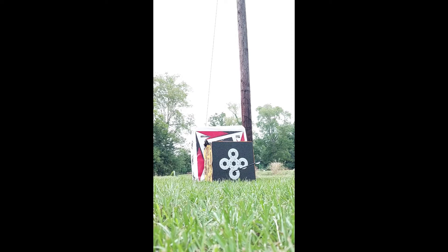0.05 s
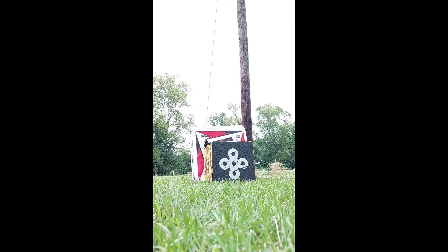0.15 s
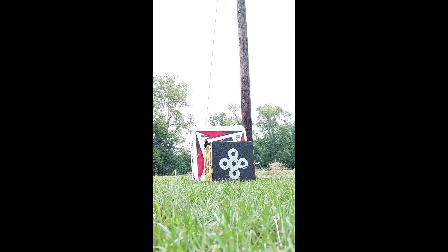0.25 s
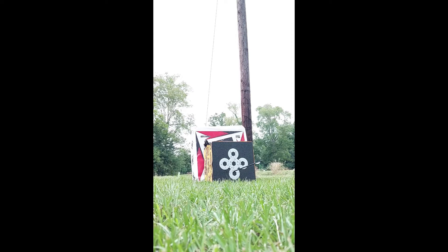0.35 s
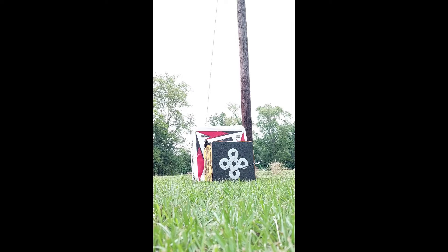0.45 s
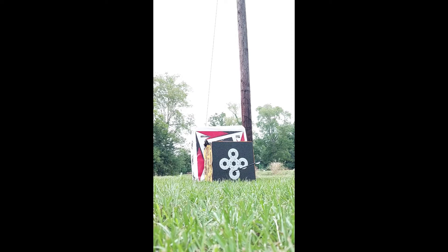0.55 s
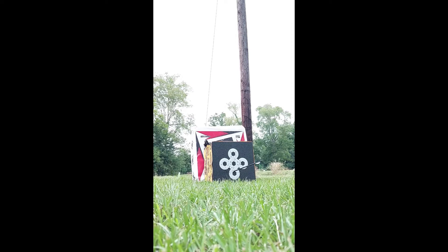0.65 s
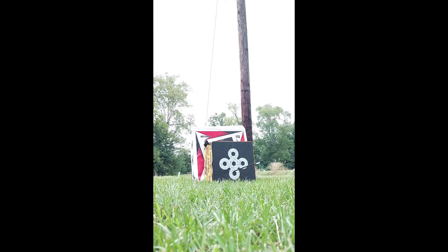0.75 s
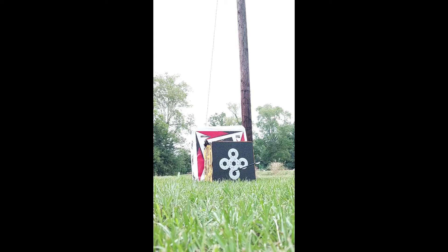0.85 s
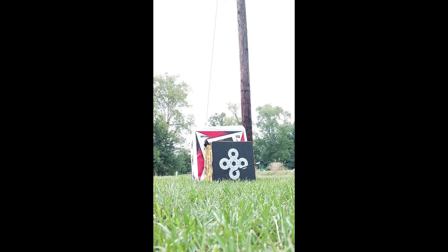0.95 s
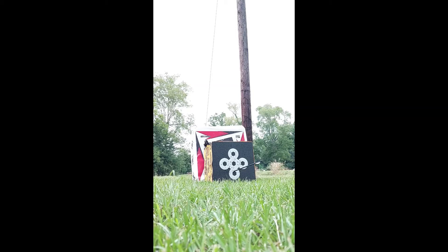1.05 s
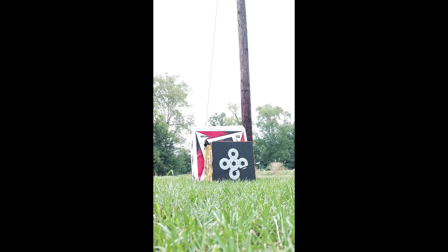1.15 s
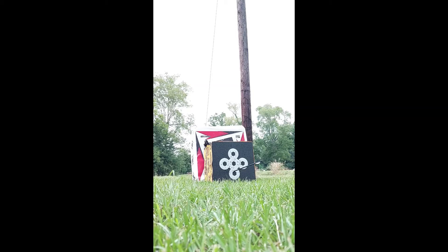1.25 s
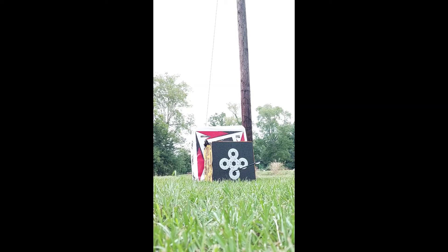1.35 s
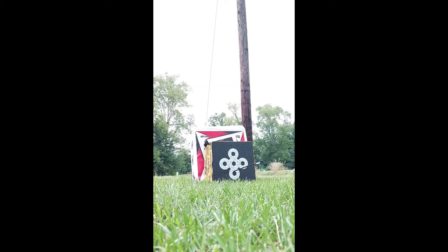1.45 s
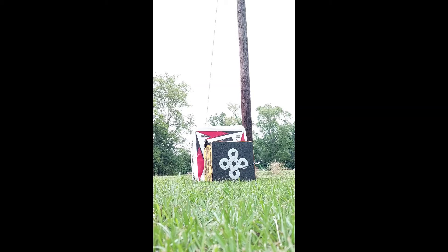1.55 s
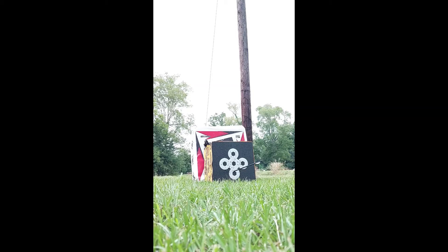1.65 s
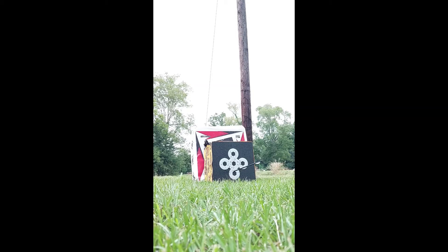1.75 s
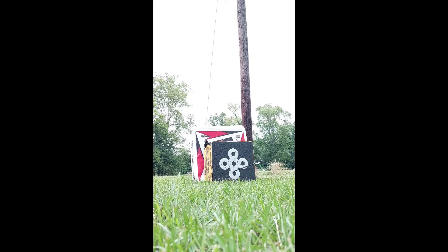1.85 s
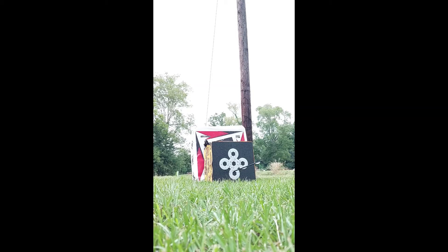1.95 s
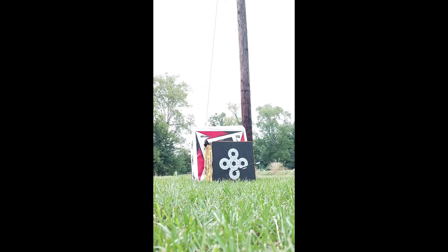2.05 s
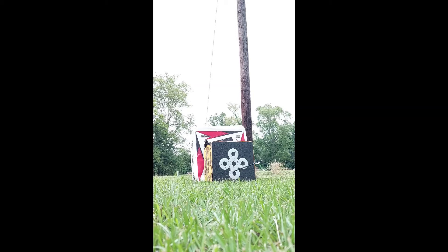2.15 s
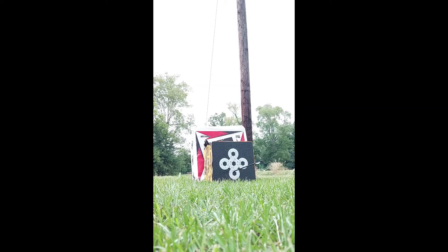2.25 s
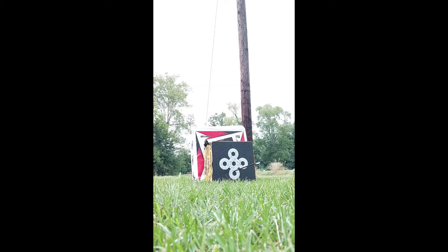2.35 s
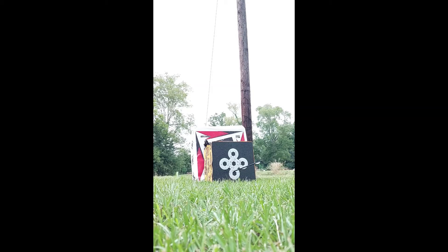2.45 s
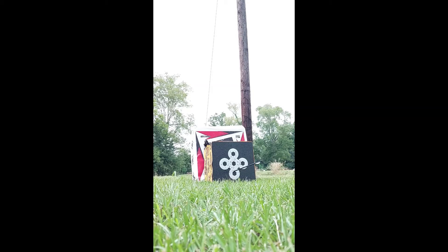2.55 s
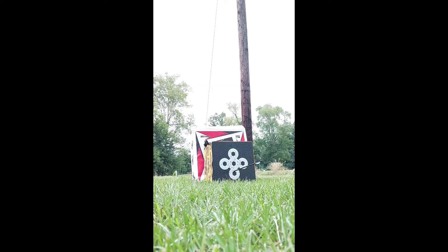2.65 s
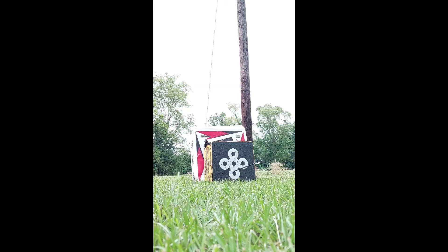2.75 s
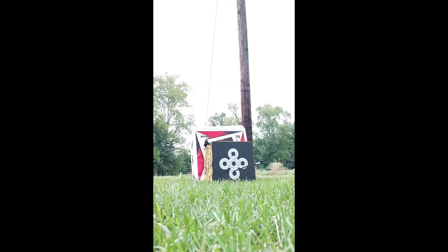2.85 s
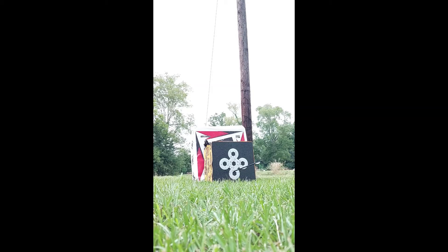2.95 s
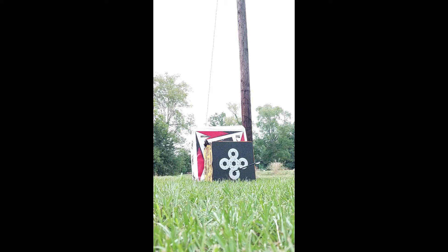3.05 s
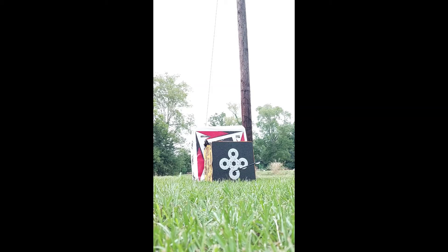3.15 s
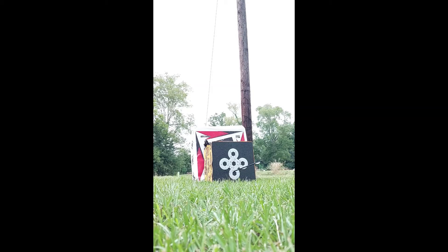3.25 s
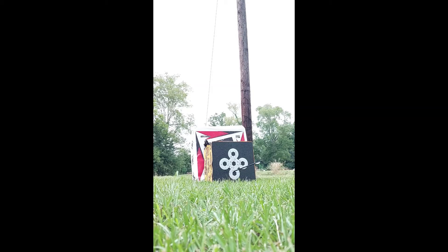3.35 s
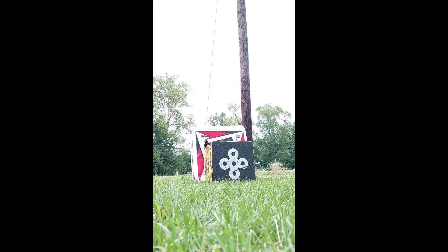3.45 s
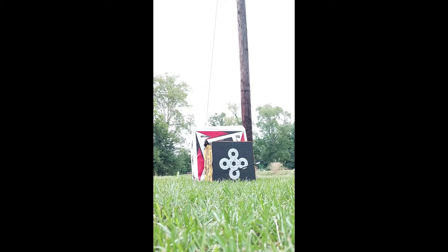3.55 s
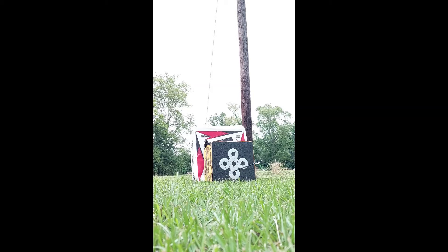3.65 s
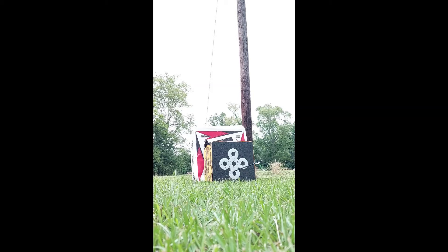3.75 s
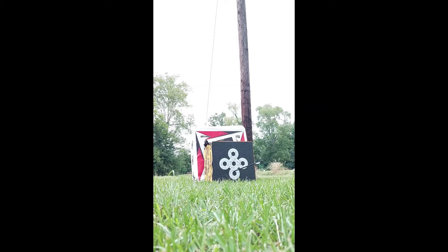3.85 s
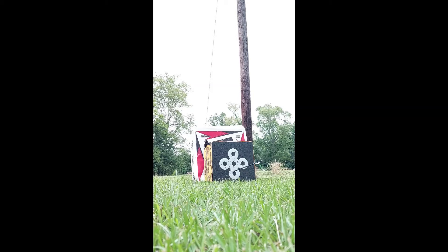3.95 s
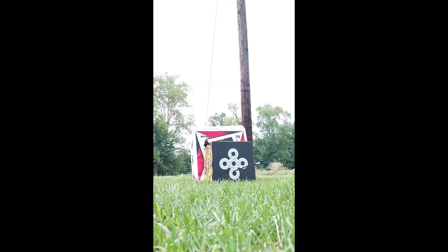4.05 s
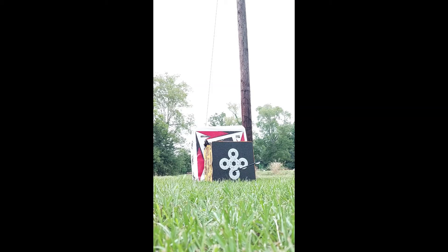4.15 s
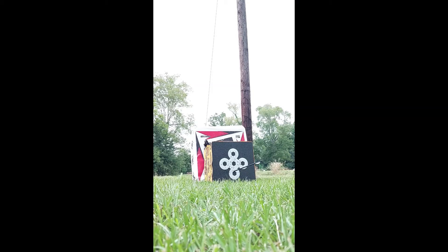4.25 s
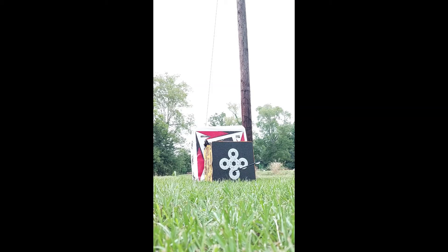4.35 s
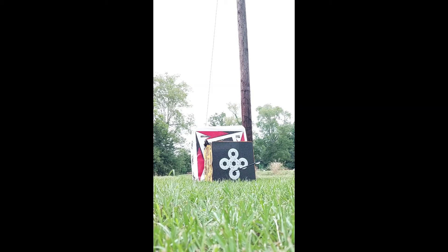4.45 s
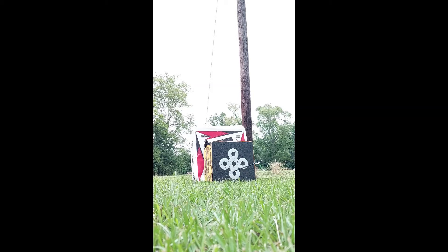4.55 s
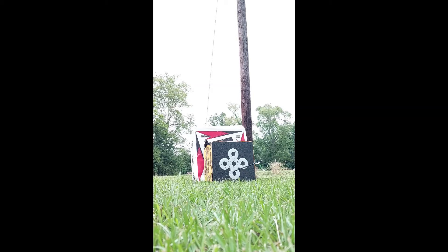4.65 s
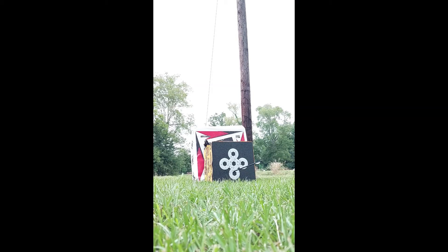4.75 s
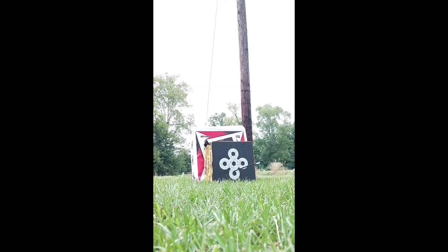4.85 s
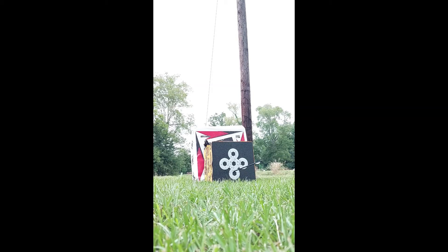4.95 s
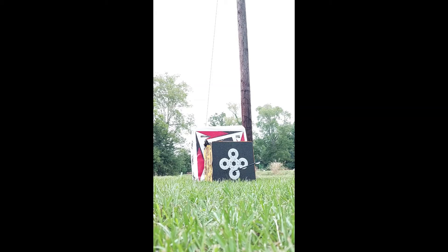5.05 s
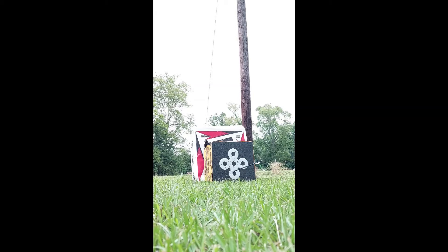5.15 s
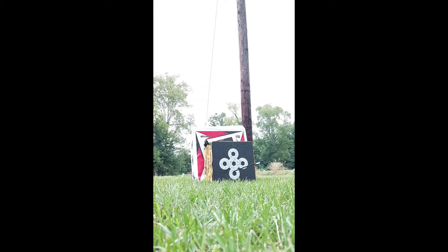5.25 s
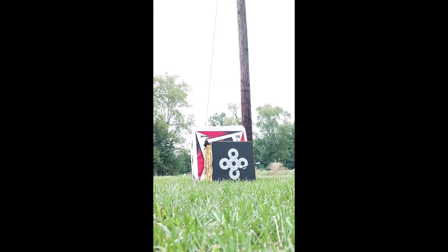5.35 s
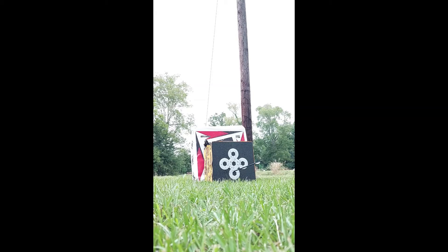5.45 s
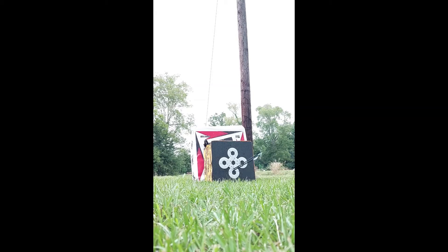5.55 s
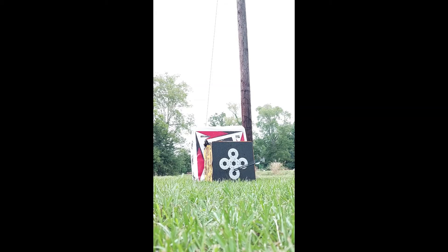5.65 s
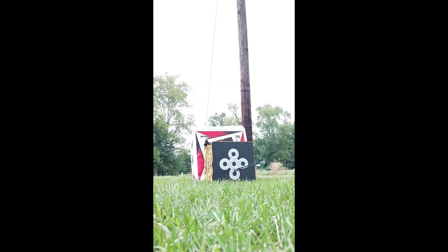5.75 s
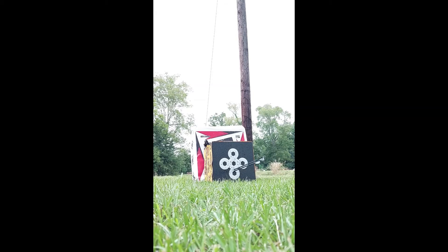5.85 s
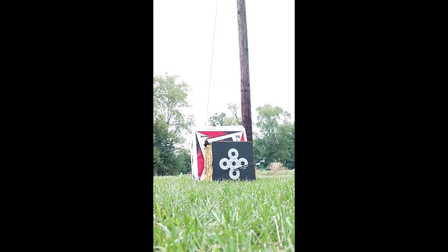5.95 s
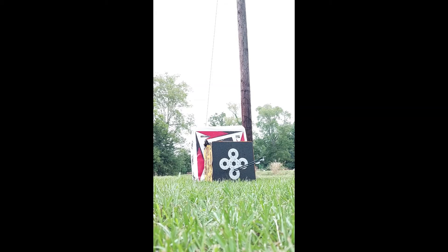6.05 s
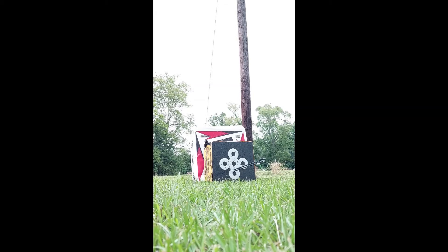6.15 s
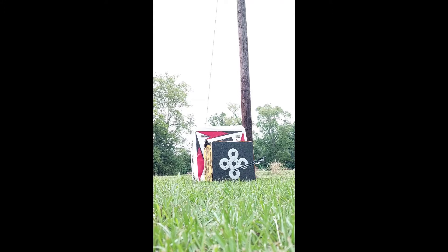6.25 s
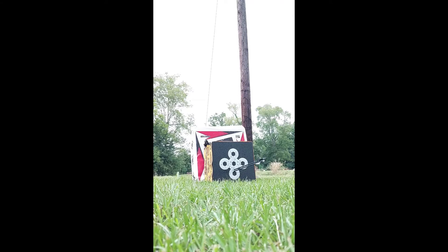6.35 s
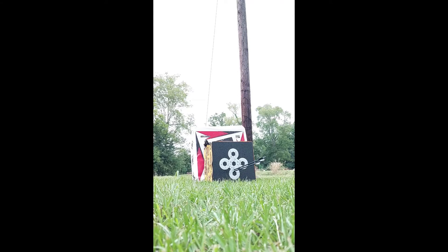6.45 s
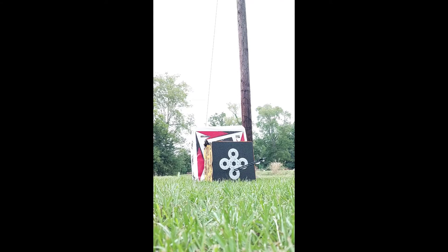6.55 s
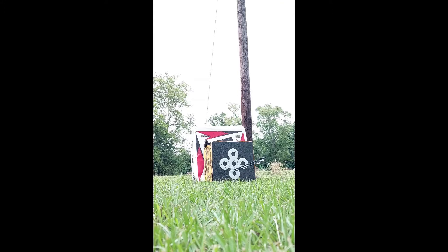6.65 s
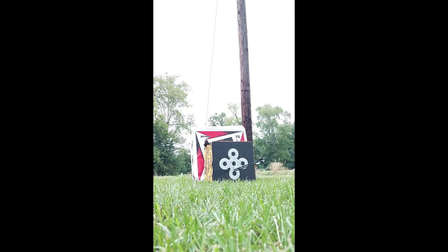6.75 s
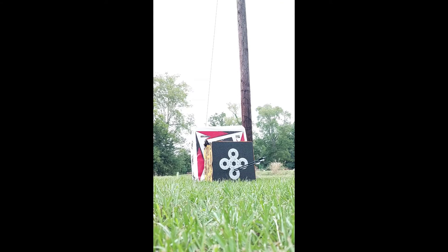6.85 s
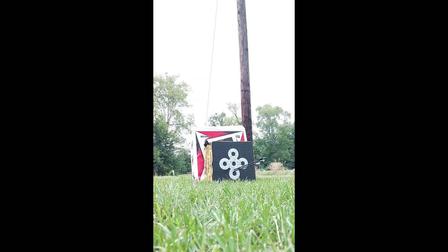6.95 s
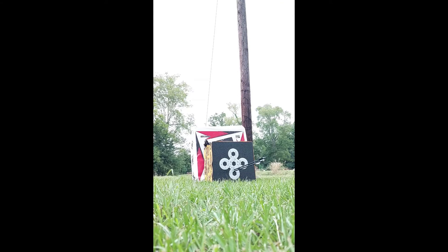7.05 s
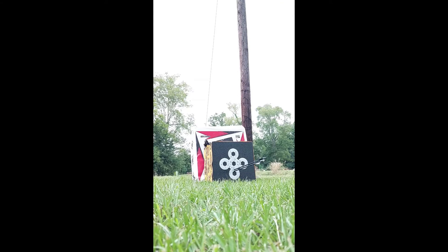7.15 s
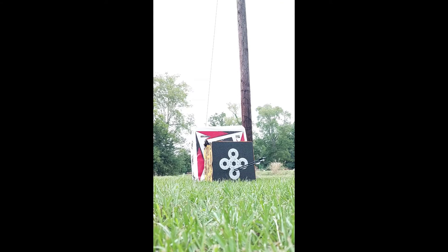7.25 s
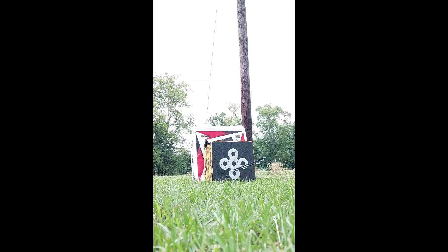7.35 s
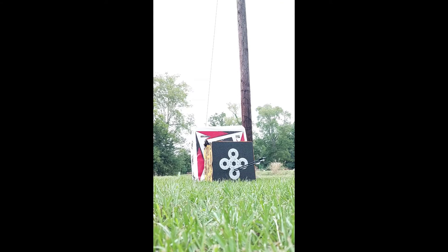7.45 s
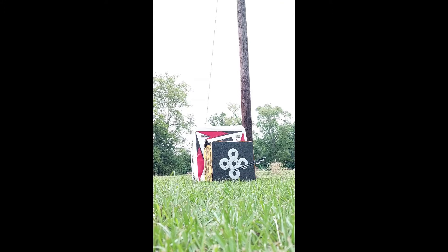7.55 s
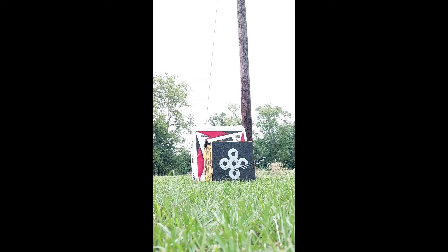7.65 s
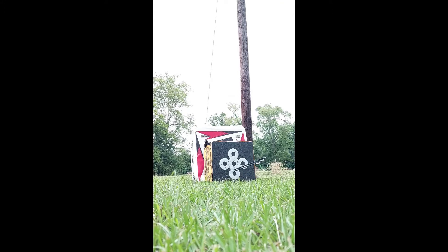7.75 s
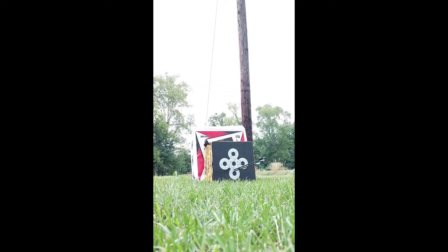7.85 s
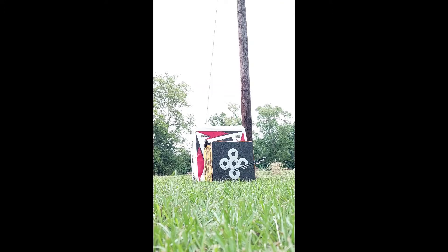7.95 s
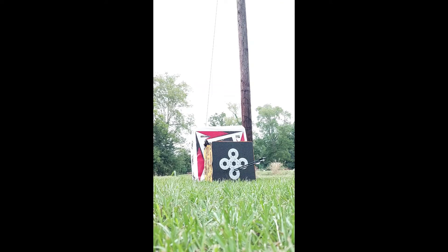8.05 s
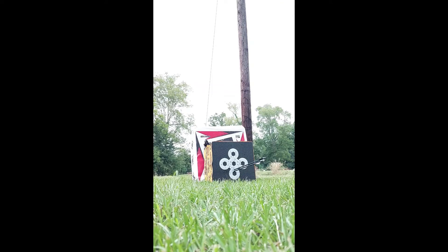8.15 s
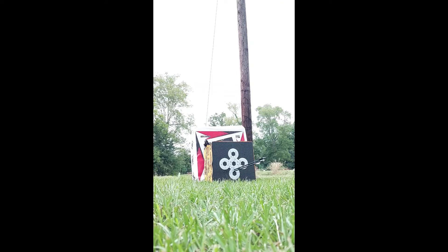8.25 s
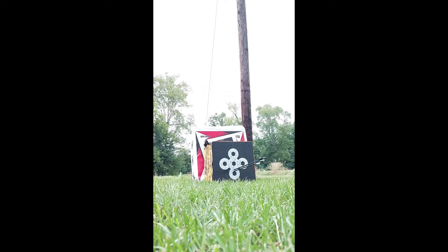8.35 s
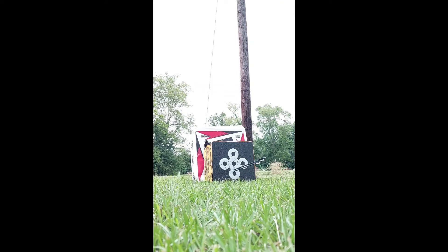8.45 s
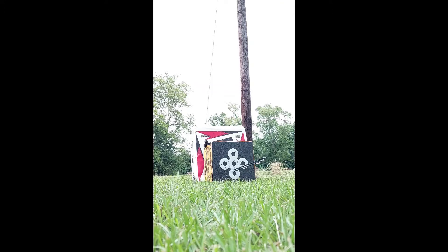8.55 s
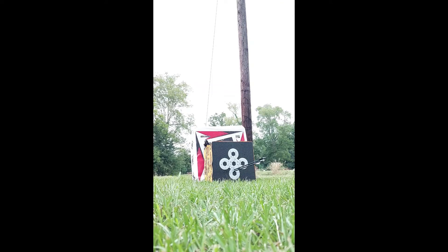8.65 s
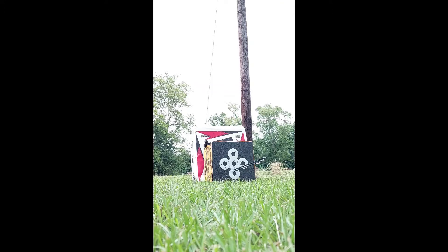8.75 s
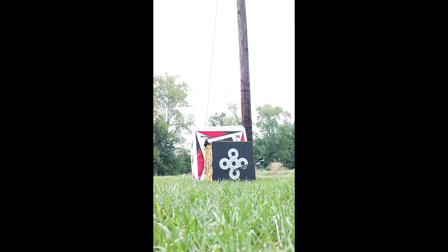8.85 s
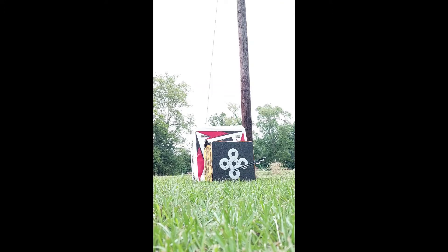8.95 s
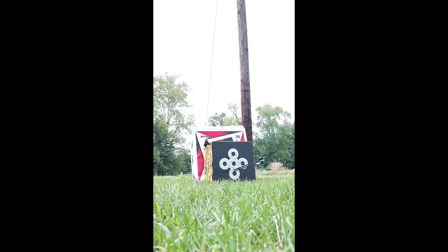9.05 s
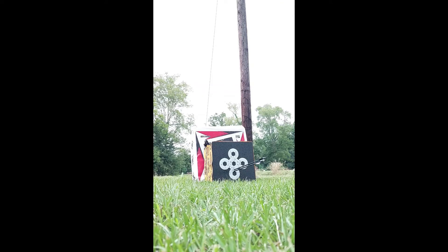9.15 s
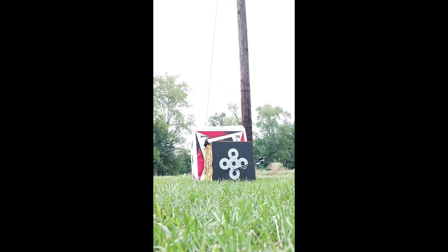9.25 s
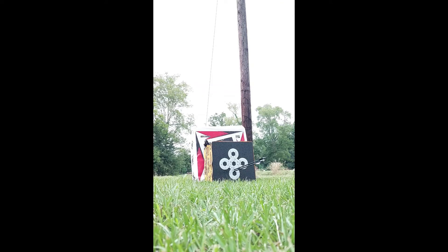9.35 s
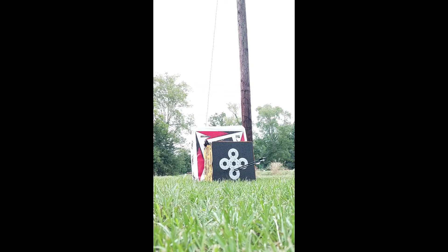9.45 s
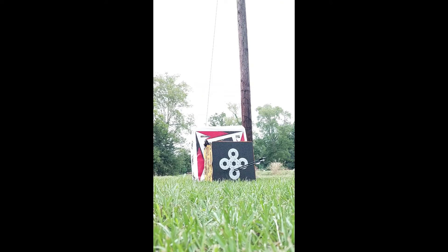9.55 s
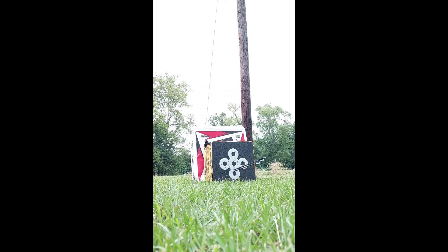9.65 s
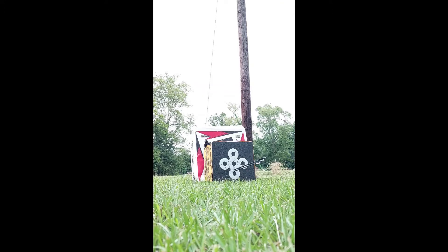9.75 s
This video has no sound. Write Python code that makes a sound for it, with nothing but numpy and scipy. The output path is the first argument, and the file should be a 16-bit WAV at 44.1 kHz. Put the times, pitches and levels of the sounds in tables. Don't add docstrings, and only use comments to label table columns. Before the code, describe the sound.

From 0 s, a distant cooling plant rumbles low and steady, with slightly wavering hums and a slow beating that fades after 2.4 s. High above it, far cicadas make an even hiss around 3 to 6 kHz, while a near one chirrs softly about once a second until 7 s. Faint bird ticks and a cricket peep dot the opening; a hoarse jay calls faintly at 3 s. At 5.37 s a distant bow thuds, feathers hiss briefly, and at 5.58 s the arrow hits: by far the loudest event, a hard dry crack and a thump near 275 Hz, mostly gone within a quarter second, with faint outdoor scatter. The phone's gain drops the background, holds, then recovers between 6.6 and 7.3 s. Faint crickets peep at 7.6 and 8.2 s. The jay calls again at 9.3 s, and a second cicada answers from the left at 9.5 and 9.7 s.

```python
import sys
import numpy as np
from scipy import signal
from scipy.fft import rfft, irfft, next_fast_len
from scipy.io import wavfile
from scipy.ndimage import uniform_filter1d

SR = 44100
rng = np.random.default_rng(int(sys.argv[2]) if len(sys.argv) > 2 else 0)


def master(y):
    cut = np.clip(np.atleast_2d(y).T, -1, 1)
    pcm = np.round(cut * 32767)
    wavfile.write(sys.argv[1], SR, pcm.astype(np.int16))


def volts_from_db(level):
    exponent = np.asarray(level, float) / 20
    return 10 ** exponent


N = 431738
T = np.arange(N) / SR

# pitch_hz, peak_db, swell_ms, delay_ms, lean_db
STRING_MODES = [(337, -35, 3.7, 0, 0), (564, -43, 3.9, 0, 0), (887, -53, 6, 0, 0)]
# centre_hz, width_octaves, level_db at the nearest point
FEATHER_BANDS = [(1800, 0.97, -63), (7960, 0.58, -53), (13000, .7, -57)]
# pitch_hz, peak_db, swell_ms, delay_ms, lean_db
SKIN_MODES = [(630, -1, .65, 0, -1), (1050, -20, .8, .55, -2), (2990, -7, .45, .09, 5),
              (4000, -15, .4, .11, 5), (5980, -19, .85, .1, 9), (6450, -11, .28, 1.1, 9),
              (10600, -28, .4, .2, 9), (13200, -34, .3, .7, 3)]
# pitch_hz, peak_db, swell_ms, delay_ms, lean_db
BLOCK_MODES = [
    (235, -10.2, 6.8, 3.04, 3),
    (275.6, 2, 13.6, 5.55, 0),
    (274.9, 2, 11.65, 10.95, 0),
    (368.3, -12, 6.1, 6.31, -3),
    (418, -15.4, 7.3, 3.26, 3),
    (250, -24, 7, 28.5, 0),
    (275, -31, 6, 59.6, 0),
]
# centre_hz, width_octaves, level_db, t60_s (time to fall 60 dB)
SCATTER_BANDS = [(130, 0.73, -28, 0.25), (400, 0.97, -25, 0.22), (736, 1.05, -17.5, 0.059),
                 (790, 1.9, -48.5, 0.5), (2680, 0.82, -14.5, 0.025), (2800, 0.7, -44, 0.68),
                 (6500, 1.5, -26, .025), (12000, 1.2, -42, .05), (11000, 1.2, -59, .7)]
# peak_s, level_db
CHIRR_EVENTS = [(.06, -46), (1.085, -45), (2.08, -45), (3.03, -45), (3.955, -46), (4.795, -43.5),
                (5.58, -44), (6.31, -46), (7.08, -46)]
# peak_s, half_length_s, level_db
ANSWER_EVENTS = [
    (9.475, .06, -51),
    (9.72, .15, -51),
]
# multiple of the click rate, level_db
TYMBAL_PARTS = [(8, -10), (9, -7), (10, -7), (11, -3), (12, -14), (13, -15)]
# peak_s, pitch_hz, glide_hz, fourth_partial_db, fourth_partial_lean_db
JAY_CALLS = [
    (3.02, 703, -4, -59, 0),
    (9.27, 705, -18, -53.5, -5),
]
# peak_s, half_length_s, pitch_hz, level_db
CRICKET_PEEPS = [
    (.33, .1, 4100, -58),
    (7.6, .12, 3670, -61),
    (8.16, .08, 3665, -57),
]
# peak_s, centre_hz, width_octaves, level_db
BIRD_TICKS = [
    (1.0, 8600, .3, -63),
    (1.24, 9700, .05, -68),
    (2.2, 8300, .15, -66),
    (3.02, 7600, .15, -65),
]
# frequency_hz, level_db per Hz
CHORUS_SPECTRUM = [(1300, -64), (1700, -23), (2400, -18.5), (2900, -6), (3600, -2.5), (4300, -1.5),
                   (5020, 1), (5940, -5.5), (7000, -11), (8800, -25.5), (10100, -18.5), (11300, -30.5),
                   (14300, -27), (15800, -39)]
# pitch_hz, level_db, waver_db
SHRILL_TONES = [(4390, -70, 3), (4505, -70, 3), (4900, -66, 3), (5130, -67, 3), (6250, -72, 3)]
# peak_s, half_length_s, level_db
RASP_BOUTS = [
    (3.6, .7, -75),
    (5.1, .6, -77.5),
    (7.9, .8, -76.5),
]
# frequency_hz, level_db per Hz
RUMBLE_SPECTRUM = [(22, -45), (32, -28), (42, -11), (55, -11.5), (100, -7.5), (150, -9), (190, -14.5),
                   (250, -12.5), (330, -20), (520, -22), (750, -26.5), (1100, -35), (1500, -43.5),
                   (2400, -65)]
# pitch_hz, level_db, waver_db
DRONE_TONES = [(59, -47, 1.5), (75.9, -48.5, 2.5), (101.1, -53, 2.5), (119.8, -54.5, 1.5), (129.9, -51, 3),
               (150, -57.5, 4), (156.6, -55.5, 3), (210.8, -64, 3), (235.5, -56, 3.5), (293.2, -56.5, 1.5),
               (349.3, -61.5, 2.5), (390, -69, 3)]
# frequency_hz, likeness (0 to 1)
PORT_LIKENESS = [(40, 1), (130, 0.95), (300, 0.85), (700, 0.88), (1400, 0), (3000, 0.35), (6000, 0.21),
                 (15000, 0.32)]
# frequency_hz, lean_db
PORT_LEAN = [(60, -1.5), (110, 2), (200, -3.5), (380, 1), (700, -1.5), (1290, -6.5), (2380, 8), (4400, 3.0),
             (8120, 5), (15000, 2.5)]

BOW_S, PASS_S, HIT_S = 5.368, 5.548, 5.576
PORTS = np.array([[1], [-1]])


def on_log(table, hz):
    f, value = np.transpose(table)
    return np.interp(np.log(np.maximum(hz, 1)), np.log(f), value)


def unit(x):
    return x / np.sqrt(np.mean(x ** 2))


def walk(rate_hz):
    knots = rng.standard_normal(int(4 * rate_hz * N / SR) + 8)
    smooth = uniform_filter1d(uniform_filter1d(knots, size=4), size=4)
    return np.interp(T, np.linspace(0, T[-1], len(knots)), 2.41 * smooth)


def pan(x, lean_db):
    return x * volts_from_db(lean_db * PORTS / 2)


def add(out, start_s, x):
    a = int(start_s * SR)
    skip, end = max(-a, 0), max(min(x.shape[1], N - a), 0)
    out[:, a + skip:a + end] += x[:, skip:end]


def band(hz, octaves, size):
    f = np.maximum(np.fft.rfftfreq(size, 1 / SR), 1)
    noise = rng.standard_normal((3, size))
    bell = np.exp(-2 * (np.log2(f / hz) / octaves) ** 2)
    return unit(irfft(rfft(noise[0] + noise[1:]) * bell, size))


def note(half_s, hz, glide_hz, rough_db, late=0.):
    u = np.linspace(-1, 1, int(2 * half_s * SR))
    knots = int(half_s * 160)
    flutter = np.interp(u, np.linspace(-1, 1, knots), rng.standard_normal(knots))
    pitch_flutter = .0016 * rough_db * np.roll(flutter, len(u) // 2)
    pitch = hz * (1 + pitch_flutter) + glide_hz * u
    phase = 2 * np.pi * (np.cumsum(pitch) / SR + rng.random())
    bell = np.exp(-(2.2 * (u - late)) ** 2)
    return np.sqrt(2) * np.sin(phase) * bell * volts_from_db(rough_db * flutter)


def wavering(tones, drift, rate_hz, skew):
    out = 0
    for hz, db, waver_db in tones:
        pitch = hz + drift * waver_db * walk(rate_hz)
        phase = 2 * np.pi * (np.cumsum(pitch) / SR + rng.random())
        level = volts_from_db(db + waver_db * walk(rate_hz))
        out = out + level * np.sin(phase + skew * rng.standard_normal() * PORTS)
    return np.sqrt(2) * out


def field(spectrum, lead_s, flicker_db, flicker_hz):
    size = next_fast_len(N)
    f = np.maximum(np.fft.rfftfreq(size, 1 / SR), 1)
    shared, left, right = rng.standard_normal((3, len(f))) + 1j * rng.standard_normal((3, len(f)))
    alike = np.clip(on_log(PORT_LIKENESS, f), 0, 1)
    late = np.exp(-2j * np.pi * f * lead_s)
    pair = np.sqrt(alike) * shared * np.array([late ** 0, late])
    pair = pair + np.sqrt(1 - alike) * np.array([left, right])
    low_hz, high_hz = spectrum[0][0], spectrum[-1][0]
    level_db = on_log(spectrum, f) + on_log(PORT_LEAN, f) * PORTS / 2
    pair = pair * volts_from_db(level_db) * (f > low_hz) * (f < high_hz)
    out, octave = 0, np.log2(f)
    for step in np.arange(np.floor(np.log2(low_hz)), np.log2(high_hz) + 1):
        window = np.cos(np.pi / 2 * np.clip(octave - step, -1, 1)) ** 2
        out = out + irfft(pair * window, size)[:, :N] * volts_from_db(flicker_db * walk(flicker_hz))
    return unit(out)


def ring(modes, size):
    out = 0
    skew = .14 * PORTS
    for hz, db, swell_ms, delay_ms, lean_db in modes:
        ms = np.maximum(1000 * T[:size] - delay_ms, 0)
        swell = ms / swell_ms * np.exp(1 - ms / swell_ms)
        out = out + pan(-volts_from_db(db) * np.sin(2 * np.pi * hz * ms / 1000 + skew) * swell, lean_db)
    return out


def arrow():
    out, size = np.zeros((2, N)), SR // 2
    add(out, BOW_S, bow(size) + feathers(size))
    add(out, HIT_S, ring(SKIN_MODES, size) + ring(BLOCK_MODES, size) + scattered(size))
    return out


def bow(size):
    wash = volts_from_db(-54.5) * band(840, 2.2, size) + volts_from_db(-63) * band(12000, 1.2, size)
    return ring(STRING_MODES, size) + wash * 1000 ** (-T[:size] / 0.33)


def feathers(size):
    t, pass_width_s = T[:size], .02
    nearness = pass_width_s / (pass_width_s + np.abs(PASS_S - BOW_S - t))
    hiss = sum(volts_from_db(db) * band(hz, width, size) for hz, width, db in FEATHER_BANDS)
    return (t < HIT_S - BOW_S) * nearness * hiss


def scattered(size):
    t = T[:size]
    arrive = 1 - np.exp(-(t / 0.0024) ** 2)
    return arrive * sum(volts_from_db(db) * band(hz, width, size) * 1000 ** (-t / t60)
                        for hz, width, db, t60 in SCATTER_BANDS)


def singers():
    out = np.zeros((2, N))
    for start_s, call in (*cicadas(), *jay(), *small_voices()):
        add(out, start_s, call)
    return out


def cicadas():
    for s, db in CHIRR_EVENTS:
        yield from chirr(s, .125 - .0065 * s, 377.3 + .85 * s, db, 0)
    for s, half_s, db in ANSWER_EVENTS:
        yield from chirr(s, half_s, 392.5, db, 3)


def chirr(s, half_s, click_hz, db, lean_db):
    comb = 0
    for multiple, part_db in TYMBAL_PARTS:
        k = round(multiple)
        comb = comb + volts_from_db(part_db) * note(half_s, k * click_hz, k * 0.54, 2.5, .06 * (10 - multiple))
    yield s - half_s, pan(volts_from_db(db) * comb, lean_db)
    flick_s = .05
    flick = volts_from_db(db - 9) * note(flick_s, 10.73 * click_hz, 0, 5.2)
    yield s + .9 * half_s - flick_s, pan(flick, lean_db)


def jay():
    for s, hz, glide_hz, fourth_db, lean_db in JAY_CALLS:
        yield from jay_note(s, .18, hz, glide_hz, -64.5, fourth_db, lean_db)
        yield from jay_note(s + .145, .075, .96 * hz, -12, -66, -62, lean_db)
        cluck_s = .016
        yield s + .18 - cluck_s, pan(volts_from_db(-60) * note(cluck_s, 2465, 0, 2.5), 0)


def jay_note(s, half_s, hz, glide_hz, third_db, fourth_db, lean_db):
    for count, db, side_db in ((3, third_db, 3), (4, fourth_db, lean_db)):
        yield s - half_s, pan(volts_from_db(db) * note(half_s, count * hz, count * glide_hz, 4.0), side_db)
    size = int(2 * half_s * SR)
    yield s - half_s, volts_from_db(-57.5) * band(2780, 0.7, size) * np.hanning(size)


def small_voices():
    for s, half_s, hz, db in CRICKET_PEEPS:
        yield s - half_s, pan(volts_from_db(db) * note(half_s, hz, 0, 2.5), 6)
    half_s = .04
    size = int(2 * half_s * SR)
    for s, hz, width, db in BIRD_TICKS:
        yield s - half_s, pan(volts_from_db(db) * band(hz, width, size) * np.hanning(size), 4)


def echoed(x):
    t = T[:SR // 2]
    tail = rng.standard_normal((2, len(t))) * 1000 ** -t * (t > .03)
    tail = tail / np.sqrt(np.sum(tail ** 2) / 2)
    return x + volts_from_db(-7) * signal.fftconvolve(x, tail, axes=1)[:, :N]


def breathing_db():
    return .5 * walk(.8)


def trees():
    swell_db = -0.1038 * T + breathing_db()
    hiss = volts_from_db(-44.5 + swell_db) * field(CHORUS_SPECTRUM, 0.000264, 0.77, 9)
    return hiss + volts_from_db(swell_db) * wavering(SHRILL_TONES, 5, 20, 0.21)


def cricket_rasp():
    level = volts_from_db(-84)
    for s, half_s, db in RASP_BOUTS:
        level = level + volts_from_db(db) * np.exp(-((T - s) / half_s) ** 2)
    return band(11700, 0.38, next_fast_len(N))[:, :N] * level * volts_from_db(1.5 * walk(25))


def plant():
    rumble = volts_from_db(-42.5 + breathing_db()) * field(RUMBLE_SPECTRUM, 0, 1.37, 6)
    return rumble + wavering(DRONE_TONES, 0.251, 4.5, 0.056)


def second_motor():
    level_db = -42.8 - 2.3 * np.maximum(T - 2.4, 0) + 0.76 * walk(2.04)
    return np.sqrt(2) * volts_from_db(level_db) * np.sin(2 * np.pi * 64.4 * T)


def scene():
    return arrow() + echoed(singers()) + trees() + cricket_rasp() + plant() + second_motor()


def band_limit(x):
    return signal.sosfilt(signal.butter(12, 15740, fs=SR, output="sos"), x)


def record(dry):
    def ramp(start_s, length_s):
        return np.clip((T - HIT_S - start_s) / length_s, 0, 1)

    duck_db = -5 * ramp(-.008, .007) - 1.5 * ramp(0, 0.69)
    recovery = ramp(1.046, .72)
    gain_db = duck_db * (1 - recovery) - 0.1 * recovery
    top_cut = signal.ellip(8, .2, 60, 15700, fs=SR, output="sos")
    mix = signal.sosfilt(top_cut, dry * volts_from_db(gain_db))
    return band_limit(mix)


dry = scene()
out = record(dry)
master(out)
```